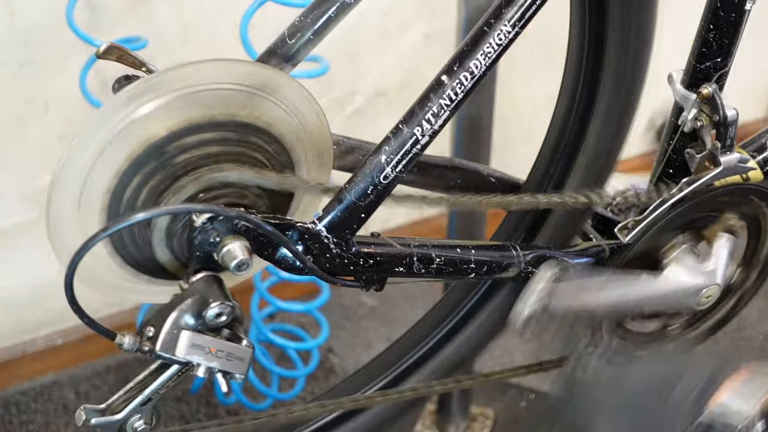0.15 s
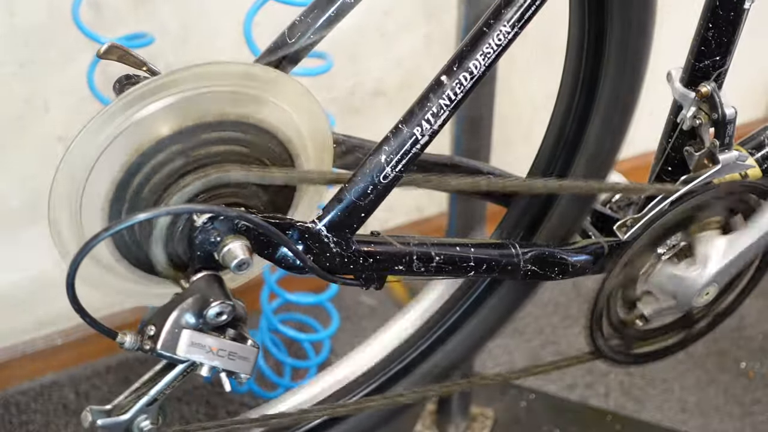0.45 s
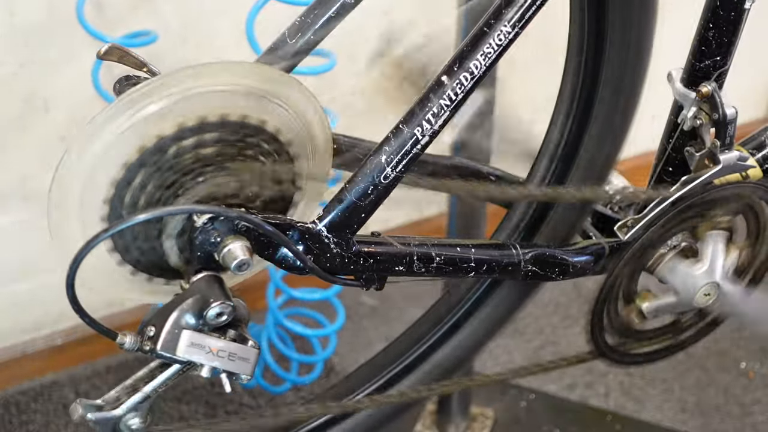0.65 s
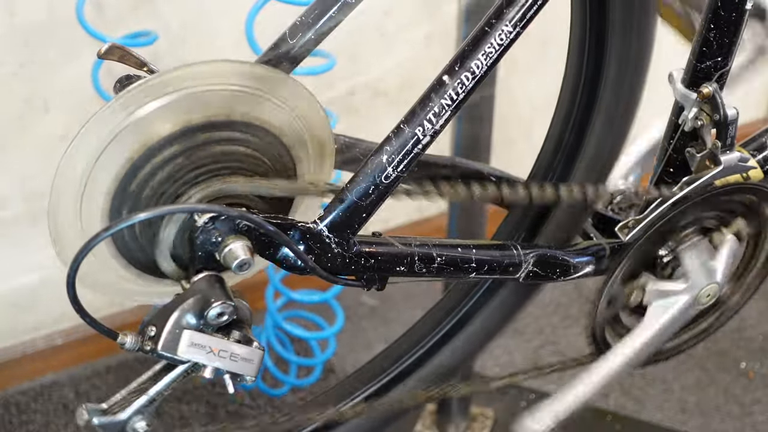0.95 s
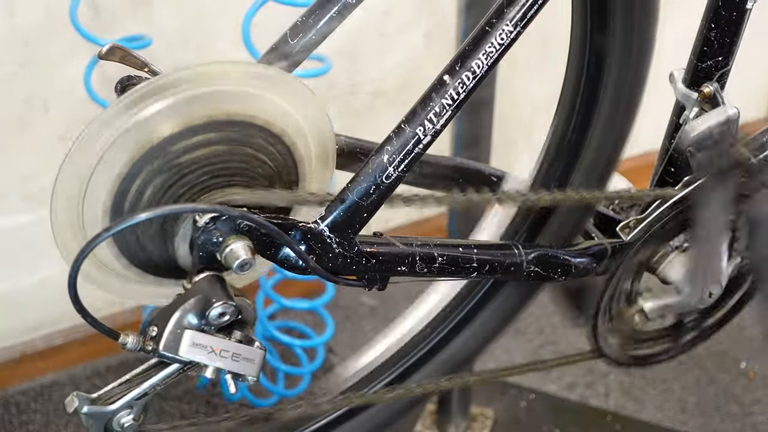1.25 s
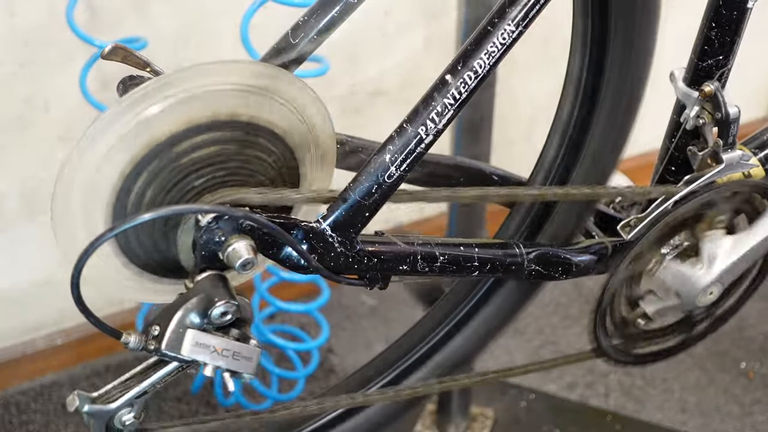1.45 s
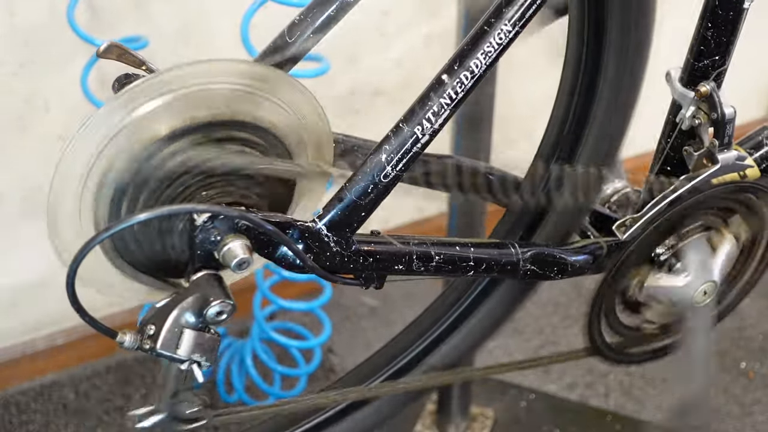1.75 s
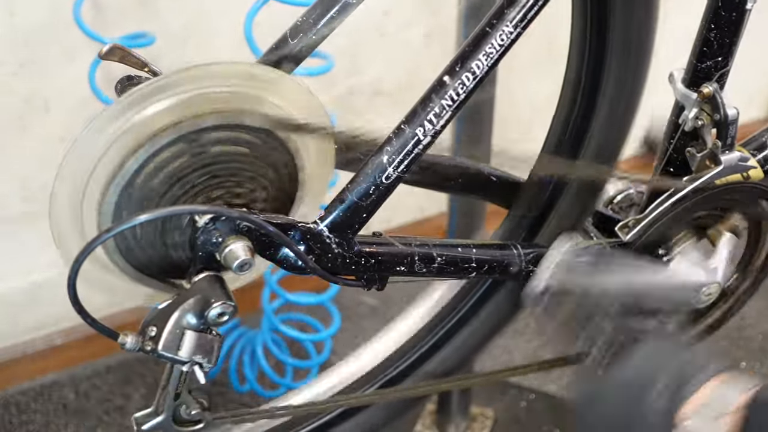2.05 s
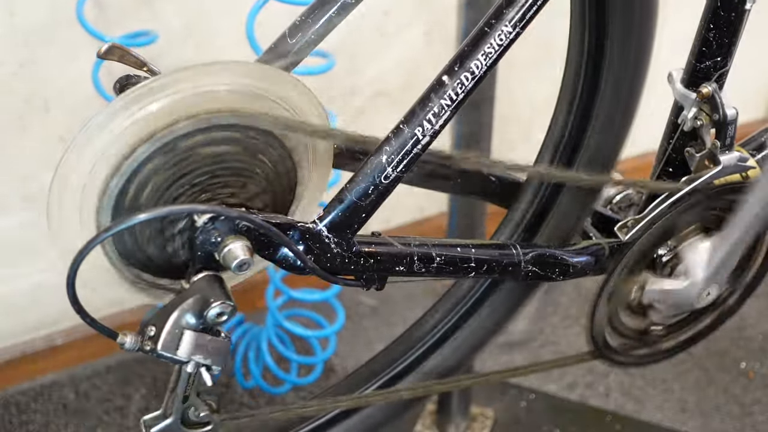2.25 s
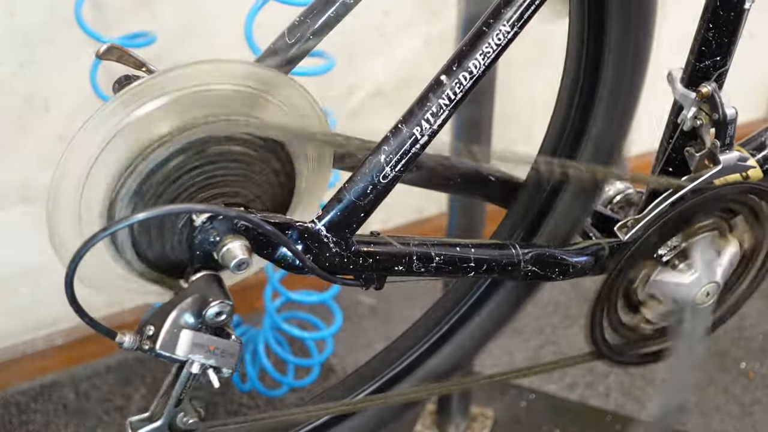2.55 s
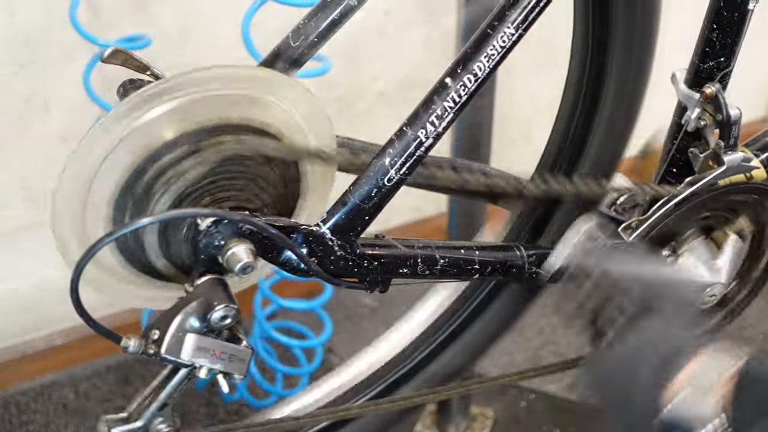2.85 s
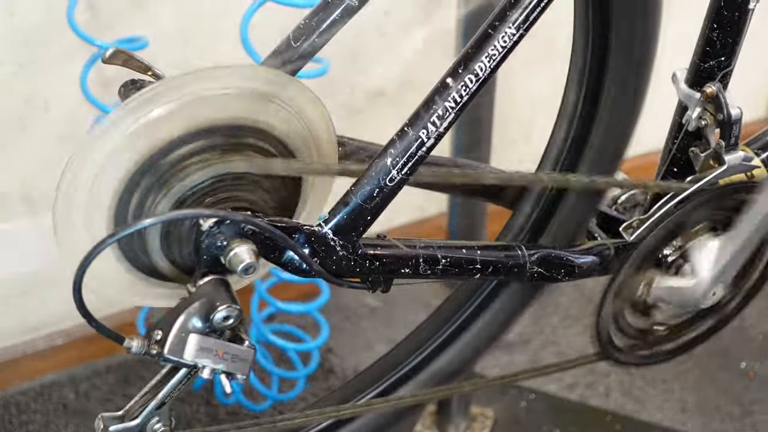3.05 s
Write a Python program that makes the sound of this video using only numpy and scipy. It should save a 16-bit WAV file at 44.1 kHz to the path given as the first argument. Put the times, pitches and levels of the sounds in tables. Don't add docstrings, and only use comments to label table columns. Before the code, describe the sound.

A bicycle drivetrain turns on a stand: faint link ticks, then bright metallic snaps, crunching shifts and frame thuds, later dense rattling clatter. Close microphone, small room with short reverberation and soft hum.

```python
import sys
import numpy as np
from scipy import signal
from scipy.fft import rfft, irfft
from scipy.io import wavfile

SR = 44100
rng = np.random.default_rng(int(sys.argv[2]) if len(sys.argv) > 2 else 0)


def gain_from_db(level_db):
    decades = np.asarray(level_db, float) / 20
    return 10 ** decades


def dump_mix(stems):
    frames = np.atleast_2d(stems).T
    limited = np.clip(frames, -1, 1)
    pcm = np.round(limited * 32767).astype(np.int16)
    wavfile.write(sys.argv[1], SR, pcm)


N = 141120
TIME = np.arange(N) / SR
STEEL_T60_S, CAGE_T60_S, FRAME_T60_S = 0.003, 0.011, 0.021


def unit(x):
    return x / np.sqrt(np.mean(x ** 2))


def ring(push, modes, t60):
    scatter_db, hold = 2.0, 256
    out, radius = 0, gain_from_db(-60 / (t60 * SR))
    for k, (hz, db) in enumerate(modes):
        w = 2 * np.pi * hz / SR
        wander = np.repeat(rng.standard_normal(N // hold + 1), hold)[:N]
        force = push * gain_from_db(db + scatter_db * wander) + 1e-18
        poles = [1, -2 * radius * np.cos(w), radius * radius]
        out = out + (-1) ** k * signal.lfilter([0, np.sin(w)], poles, force)
    return out


def grains(per_s, spread):
    size = gain_from_db(spread * np.minimum(rng.exponential(1, N), 5)) * rng.choice([-1, 1], N)
    return unit(size * (rng.random(N) < per_s / SR))


def strikes(s, level):
    at = np.zeros(N)
    at[(s * SR).astype(int)] = level
    return at


# f/Hz, level/dB
HUM_SPECTRUM = [(25, 1), (60, -8), (200, 4), (500, 0), (1000, -3.5), (2600, -4.5), (8000, -30),
                (15500, -13)]


def hum():
    hz, db = np.transpose(HUM_SPECTRUM)
    f = np.maximum(np.fft.rfftfreq(N, 1 / SR), 1)
    shape = gain_from_db(np.interp(np.log(f), np.log(hz), db))
    return gain_from_db(-42) * unit(irfft(rfft(rng.standard_normal(N)) * shape, N))


def room(x):
    t60_s, treble_t60_s, gap_s = 0.29, 0.12, 0.003
    wall_cut_hz, low_cut_hz, level_db = 2700, 273, -7.0
    t, noise = np.arange(SR // 2) / SR, rng.standard_normal(SR // 2)
    low = signal.lfilter(*signal.butter(1, wall_cut_hz, fs=SR), noise)
    treble = noise - low
    tail = low * gain_from_db(-60 * t / t60_s) + treble * gain_from_db(-60 * t / treble_t60_s)
    tail = tail * (t > gap_s)
    tail = signal.lfilter(*signal.butter(2, low_cut_hz, "high", fs=SR), tail)
    return gain_from_db(level_db) * signal.fftconvolve(x, tail / np.sqrt(np.sum(tail ** 2)))[:N]


# t/s, rattle level/dB, frame rumble level/dB
AGITATION = [(0.0, -21.5, -31), (0.05, -39, -43.5), (0.45, -35, -34.5), (0.7, -37.5, -39),
             (0.95, -39, -33.5), (1.2, -38, -42), (1.45, -40, -33.5), (1.6, -16, -34.5), (1.9, -31.5, -22),
             (2.0, -32, -32), (2.15, -24, -34.5), (2.3, -25, -34), (2.45, -25, -37), (2.6, -26, -36.5),
             (2.8, -39, -37.5), (3.2, -35.5, -56)]
# f/Hz, level/dB
STAND_MODES = [(60, 2), (110, 1)]


def stand():
    s, _, rumble_db = np.transpose(AGITATION)
    shudder = unit(ring(grains(400, 1.0), STAND_MODES, 0.15))
    return gain_from_db(np.interp(TIME, s, rumble_db) - 22) * shudder


# f/Hz, level/dB
STEEL_MODES = [(3700, -0.5), (4400, 1), (5000, 1.5), (5600, 1.5), (6300, 1), (7100, 0.5), (8100, -1),
               (9000, -1), (9900, -1.5), (11000, -4), (12000, -6), (13200, -8), (14600, -13)]
# f/Hz, level/dB
PULLEY_MODES = [(1400, -1), (2100, 1.5), (2300, 5), (2520, 6), (2750, 3), (3400, 2)]
# f/Hz, level/dB
FRAME_MODES = [(150, -10), (215, 0), (300, -0.5), (410, 2.5), (548, 2), (680, -1.5), (880, -2.5),
               (1050, -4.5), (1250, -6)]


def rattle():
    s, link_db, rumble_db = np.transpose(AGITATION)
    per_s, spread = 900, 2.6
    steel = unit(ring(grains(per_s, spread), STEEL_MODES[:10], STEEL_T60_S))
    pulley = unit(ring(grains(per_s, spread), PULLEY_MODES, CAGE_T60_S))
    links = gain_from_db(-9.5) * steel + gain_from_db(-12.5) * pulley
    rumble = unit(ring(grains(1500, 2.7), FRAME_MODES[2:], FRAME_T60_S))
    return gain_from_db(np.interp(TIME, s, link_db)) * links + gain_from_db(np.interp(TIME, s, rumble_db) - 2) * rumble


# f/Hz, level/dB, T60/s
PING_MODES = [(7430, 10, 0.18), (5100, 6.5, .08), (10370, -3, 0.06), (11830, 0, .055), (13610, -6, .1)]


def pings():
    t = np.maximum(TIME - 0.28, 0)
    return sum(gain_from_db(-29 + db - 60 * t / t60) * np.sin(2 * np.pi * hz * t) for hz, db, t60 in PING_MODES)


# t/s, peak level/dB
ROLLER_KNOCKS = [(2.0123, -17), (2.0298, -9), (2.0996, -17), (2.1096, -16), (2.1276, -15), (2.1475, -18),
                 (2.1624, -16), (2.168, -16), (2.1869, -19), (2.2019, -15), (2.2204, -14), (2.2374, -18),
                 (2.2484, -22), (2.2667, -22), (2.2747, -19), (2.2934, -21), (2.2997, -16), (2.3236, -17),
                 (2.3394, -17), (2.3695, -20), (2.3895, -20), (2.4014, -19), (2.4289, -16), (2.4448, -16),
                 (2.4628, -17), (2.4724, -18), (2.4823, -16), (2.5027, -17), (2.5074, -17), (2.5366, -18),
                 (2.5496, -14), (2.5636, -12), (2.5714, -16), (2.588, -14), (2.6189, -20), (2.6399, -16),
                 (2.6544, -20), (2.6848, -14), (2.6918, -13), (2.7162, -12), (2.7626, -16), (2.8589, -17),
                 (2.8789, -11), (2.8874, -18), (2.9054, -21), (2.9257, -16), (2.9447, -18), (2.9632, -23),
                 (3.0006, -23), (3.0195, -14), (3.0989, -18), (3.1428, -36), (3.1782, -19), (3.1924, -19)]
# t/s, peak level/dB
LINK_TICKS = [(.0014, -41), (.0209, -32), (.0398, -25), (.0817, -27), (.1044, -30), (.1194, -30),
              (.1274, -24), (.1486, -28), (.172, -21), (.4294, -23), (.462, -17), (.4715, -31),
              (.5324, -26), (.548, -34), (.5804, -27), (.5872, -16), (.6114, -32), (.6384, -17), (.65, -27),
              (.6744, -31), (.6973, -21), (1.4521, -30), (1.6656, -21), (1.7114, -9), (1.9894, -27),
              (2.833, -28), (2.857, -34)]


def knocks():
    out = 0
    contact = np.exp(-np.arange(300) / SR / 0.002)
    for rows, trim_db, modes, t60 in ((ROLLER_KNOCKS, -23, PULLEY_MODES[1:5], 0.011),
                                      (ROLLER_KNOCKS, -23.5, STEEL_MODES, STEEL_T60_S),
                                      (LINK_TICKS, -22, STEEL_MODES[2:9], STEEL_T60_S)):
        s, db = np.transpose(rows)
        at = strikes(s, gain_from_db(db + trim_db))
        rough = signal.fftconvolve(at, contact)[:N] * rng.choice([-1, 1], N)
        out = out + ring(rough + gain_from_db(11.0) * at, modes, t60)
    return out


# t/s, f/Hz, level/dB
DROPS = [
    (0.231, 152, -18),
    (.76, 140, -28),
    (1.0, 112, -27),
    (1.329, 447, -5),
    (1.793, 218, -8),
    (1.873, 930, -3.5),
    (2.053, 144, -23),
    (2.202, 1390, -9),
    (2.799, 150, -26),
]


def thuds():
    out = 0
    for s, hz, db in DROPS:
        cycles = np.maximum(TIME - s, 0) * hz
        t60_cycles = 11.0 * (hz / 200) ** 0.5
        swell = 1 - np.exp(-cycles)
        out = out + gain_from_db(db - 60 * cycles / t60_cycles) * swell * np.sin(2 * np.pi * cycles)
    return out


# peak t/s, rise t/s, frame level/dB, cage level/dB, steel level/dB
GRINDS = [(0.191, 0.0012, -15.5, -14, -32), (0.236, 0.0086, -16, -10.5, -9), (0.312, 0.01, -21, -32, -47),
          (0.332, 0.0091, -21, -15.5, -36), (0.763, 0.01, -12.5, -14, -10.5),
          (0.803, 0.0082, -10, -18.5, -12), (0.844, 0.015, -22.5, -17, -27),
          (1.128, 0.0063, -14.5, -26, -44), (1.212, 0.011, -21.5, -23.5, -32),
          (1.254, 0.012, -10, -12, -16.5), (1.282, 0.01, -14, -17.5, -26.5),
          (1.342, 0.018, -16.5, -18.5, -56), (1.767, 0.02, -38, -17, -28), (1.798, 0.02, -10, -24, -11),
          (1.815, 0.013, -45, -10, -17), (1.876, 0.0074, -13.5, -13, -18), (2.053, 0.0054, -35, -13, -19),
          (2.22, 0.013, -20.5, -45, -34), (2.508, 0.009, -23.5, -20, -31), (2.808, 0.0059, -27, -82, -29)]
# f/Hz, level/dB
CAGE_MODES = [(1400, -6), (1850, 1.5), (2150, 2.5), (2450, 3), (2700, 4.5), (3000, 2.5), (3350, -3.5),
              (3900, -6)]


def shifts():
    out = 0
    bodies = ((FRAME_MODES[1:], FRAME_T60_S, -26, 0.012), (CAGE_MODES, CAGE_T60_S, -22, 0.0097),
              (STEEL_MODES, STEEL_T60_S, -18, 0.021))
    for k, (modes, t60, trim_db, fall_s) in enumerate(bodies):
        swell = 0
        for row in GRINDS:
            peak_s, rise_s, db = row[0], row[1], row[2 + k]
            rise, fall = -((TIME - peak_s) / rise_s) ** 2, (peak_s - TIME) / fall_s
            swell = swell + gain_from_db(db) * np.exp(np.where(TIME < peak_s, rise, fall))
        out = out + gain_from_db(trim_db) * ring(swell * grains(1400, 2.43), modes, t60)
    return out


def crack_shape():
    crack_s, shudder_s, lead_s = 0.00081, 0.0072, 0.0025
    t = np.arange(-400, 1500) / SR
    after = np.maximum(t, 0)
    crack = after / crack_s * np.exp(1 - 2 * after / crack_s)
    shudder = np.exp(-after / shudder_s) * (1 - np.exp(-after / crack_s))
    scrape = np.exp(-np.abs(t) / lead_s)
    return crack + gain_from_db(-11.5) * shudder + gain_from_db(-14.0) * scrape


# t/s, steel peak level/dB, cage or pulley level re steel/dB
LINK_SNAPS = [(0.0622, -30, -4), (0.0976, -33, 4.5), (0.1872, -6, -11), (0.2278, -10.5, 3),
              (0.291, -11, -3), (0.302, -12, -4), (0.3331, -15, -2), (0.3606, -11.5, -4),
              (0.3719, -5.5, -7.5), (0.4827, -7, -6.5), (0.5261, -19, -1), (0.542, -21.5, -7),
              (0.561, -23.5, -1.5), (0.603, -22, -53), (0.6574, -26.5, -1.5), (0.7426, -20, -8),
              (0.7588, -8.5, -4), (0.7753, -7, -2), (0.8, -21, -22), (0.824, -9, 0), (0.856, -10.5, -21),
              (0.8813, -6, -3), (0.904, -13, -3), (0.9774, -17.5, -5.5), (1.018, -25, 4.5),
              (1.064, -29.5, -34),
              (1.0853, -26.5, -19), (1.125, -11, -6.5), (1.1672, -14, -6.5), (1.2296, -24, 6.5),
                (1.2521, -24, 11), (1.3364, -15, -3), (1.42, -28.5, 3), (1.481, -3, -6.5),
                (1.5448, -7, 2.5), (1.579, -4.5, -5), (1.6162, -6.5, -0.5), (1.6538, -7.5, 1),
                (1.6832, -11, -1), (1.6977, -4, -2.5), (1.7588, -21, 4), (1.934, -8.5, -3.5),
                (2.028, -10, -13), (2.0615, -4.5, -28), (2.1017, -14, -17), (2.108, -12, -1),
                (2.129, -19, -17), (2.1473, -14.5, -7), (2.1626, -17.5, -2), (2.187, -15, -5),
                (2.2022, -5.5, -1), (2.2213, -10.5, 0.5), (2.2968, -20, 3),
              (2.3198, -14.5, -12), (2.3244, -11, 3), (2.3374, -13, -17), (2.386, -13.5, 5),
              (2.4001, -4.5, -26), (2.4294, -9.5, -1.5), (2.443, -13.5, 6), (2.4649, -11.5, -35),
              (2.5065, -6, 6.5), (2.5498, -7.5, 2), (2.5637, -11.5, -21), (2.5863, -5.5, -8),
              (2.5984, -11.5, 3), (2.6402, -14, 0), (2.6829, -5.5, 2), (2.7166, -11.5, -3),
              (2.7623, -17.5, 0), (2.804, -32.5, -24), (2.8809, -18.5, 6), (2.9255, -12, -17),
              (2.9434, -17, -4), (2.962, -17.5, -71), (3.017, -11.5, -3), (3.0984, -17.5, 1.5),
              (3.1794, -24.5, 1.5), (3.1924, -13.5, -43)]
# f/Hz, level/dB
SKIP_MODES = [(1840, -2), (3270, 0.5), (5590, -8), (6150, -5), (7800, -5.5), (8400, -2.5)]
# f/Hz, level/dB
STAY_MODES = [(1643, -13), (1660, -16), (548, -5), (520, -8)]


def snaps():
    s, db, cage_db = np.transpose(LINK_SNAPS)
    faint = db <= -18
    late = s > 2.3
    skip = (s > 1.5) & (s < 1.72)
    steel_db = db - 13.5
    ring_db = db + np.minimum(cage_db, 3) - 22.5
    # modes, T60/s, level of each snap, hard contact level/dB
    bodies = ((STEEL_MODES, STEEL_T60_S, gain_from_db(steel_db) * ~faint, 4.0),
              (STEEL_MODES[3:8], STEEL_T60_S, gain_from_db(steel_db + 0.5) * faint, 6.0),
              (CAGE_MODES, CAGE_T60_S, gain_from_db(ring_db) * ~late * ~skip, 15.0),
              (SKIP_MODES, 0.008, gain_from_db(ring_db + 4.5) * skip, 17.0),
              (PULLEY_MODES, CAGE_T60_S, gain_from_db(ring_db - 6.5) * late, 16.0),
              (FRAME_MODES, FRAME_T60_S, gain_from_db(db - 37.5), 6.0))
    out, crack, rough = 0, crack_shape(), rng.choice([-1, 1], N)
    for modes, t60, level, hard_db in bodies:
        at = strikes(s, level)
        push = signal.fftconvolve(at, crack)[400:N + 400] * rough
        hard = gain_from_db(hard_db) * np.roll(at, 20)
        out = out + ring(push + hard, modes, t60)
    return out + gain_from_db(-24.0) * ring(strikes(s, gain_from_db(db)), STAY_MODES, 0.16)


def scene():
    bike = snaps() + shifts() + rattle() + pings() + thuds()
    bike = signal.sosfilt(signal.butter(3, 90, "high", fs=SR, output="sos"), bike)
    near = knocks()
    return (bike + near + room(bike + 0.5 * near) + hum() + stand())[None]


def roll_off(x):
    return signal.sosfilt(signal.butter(12, 16690, fs=SR, output="sos"), x)


def record(dry):
    ceiling, cutoff_hz = 0.93, 16600
    rounded = ceiling * np.tanh(dry / ceiling)
    x = signal.sosfilt(signal.cheby2(8, 50, cutoff_hz, fs=SR, output="sos"), rounded)
    return roll_off(x)


dry = scene()
out = record(dry)
dump_mix(out)
```